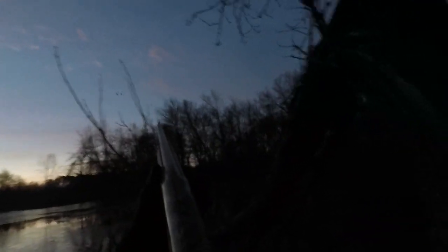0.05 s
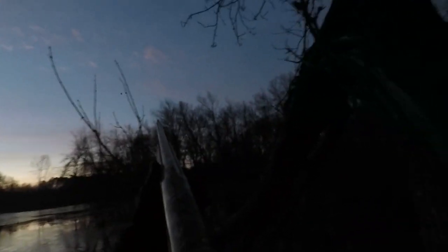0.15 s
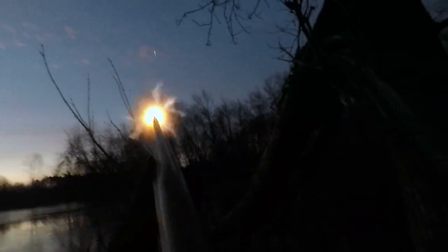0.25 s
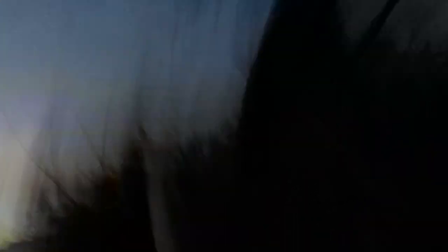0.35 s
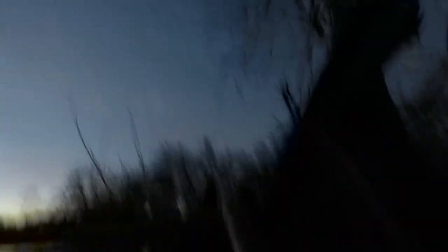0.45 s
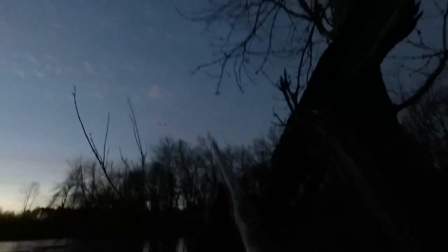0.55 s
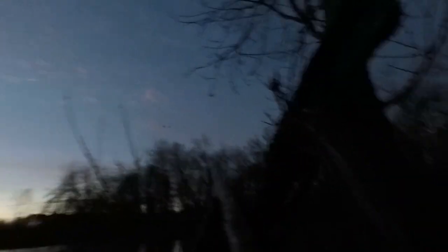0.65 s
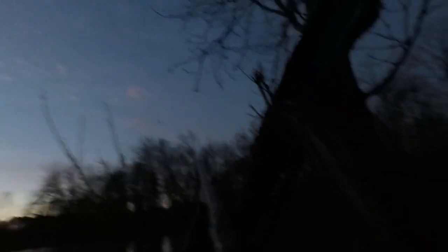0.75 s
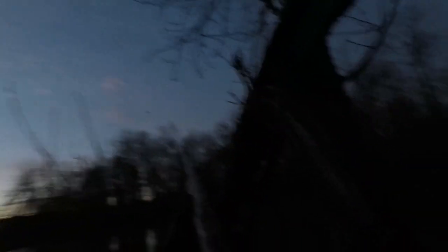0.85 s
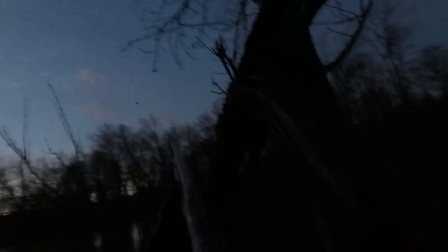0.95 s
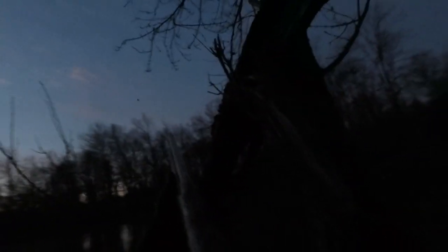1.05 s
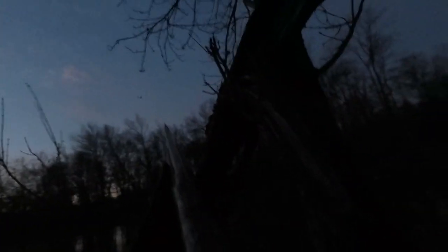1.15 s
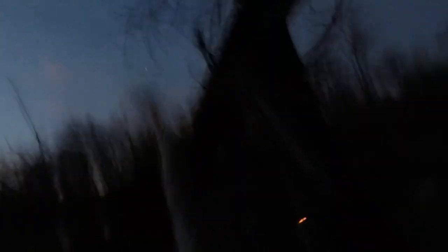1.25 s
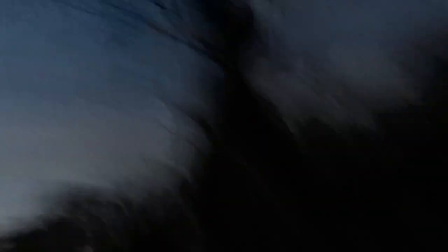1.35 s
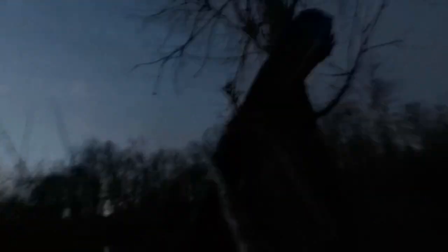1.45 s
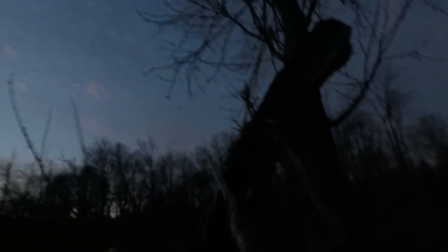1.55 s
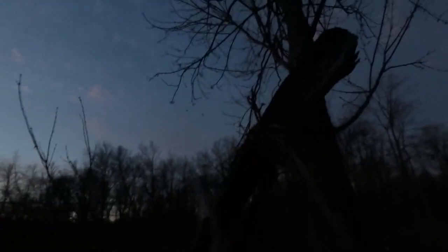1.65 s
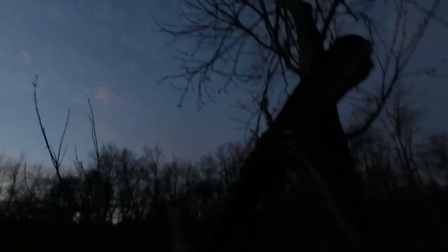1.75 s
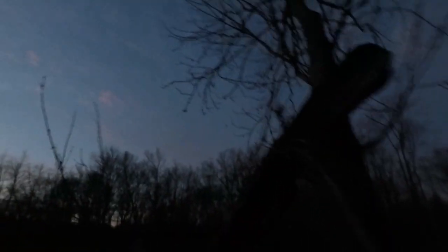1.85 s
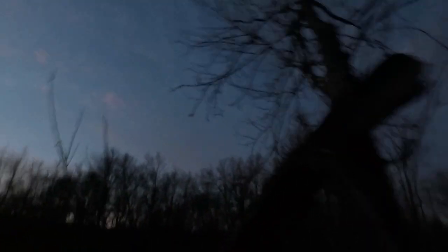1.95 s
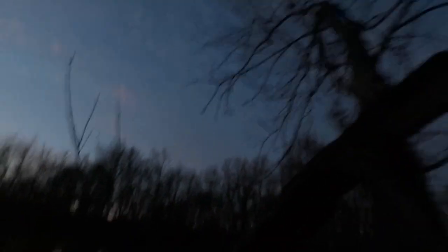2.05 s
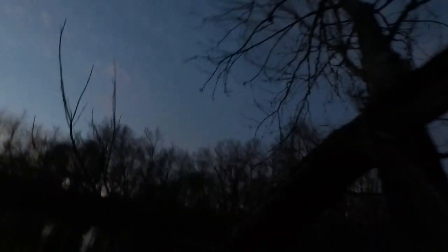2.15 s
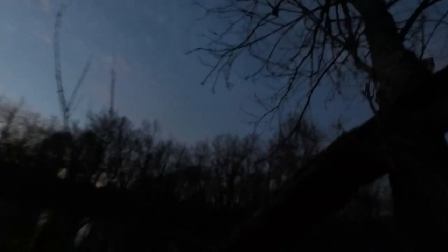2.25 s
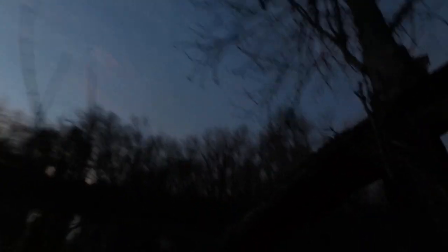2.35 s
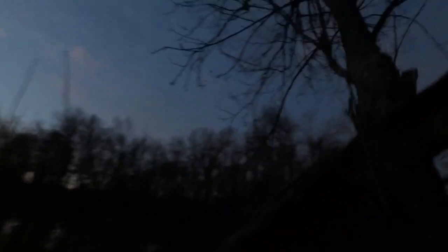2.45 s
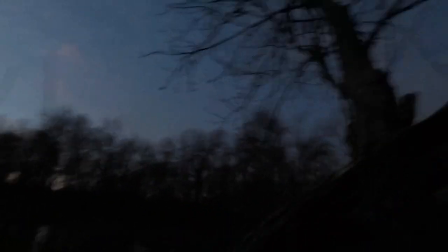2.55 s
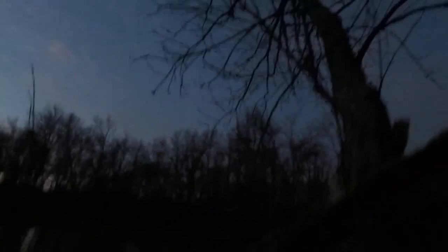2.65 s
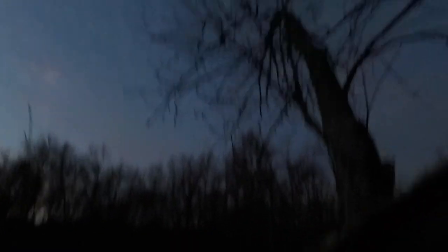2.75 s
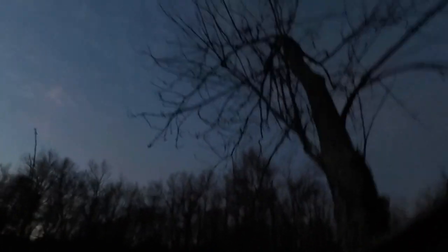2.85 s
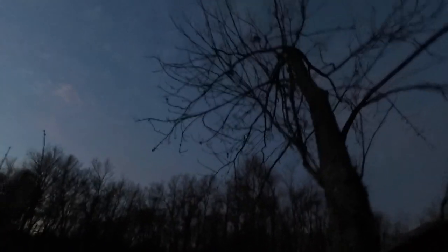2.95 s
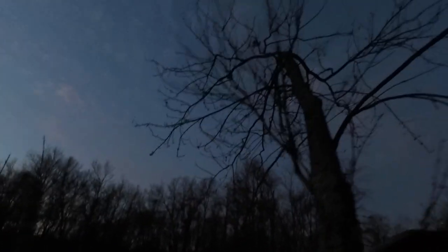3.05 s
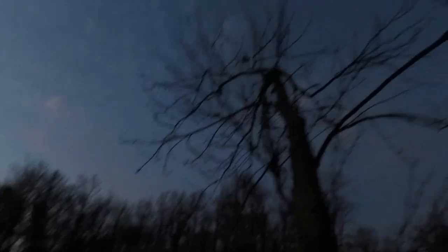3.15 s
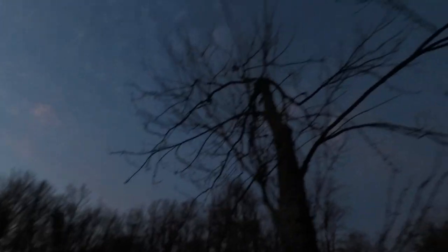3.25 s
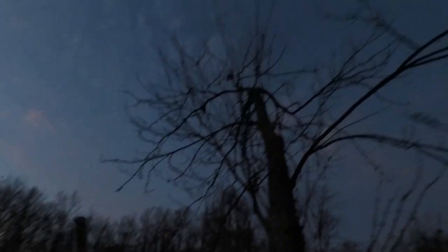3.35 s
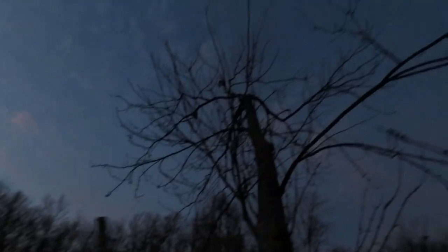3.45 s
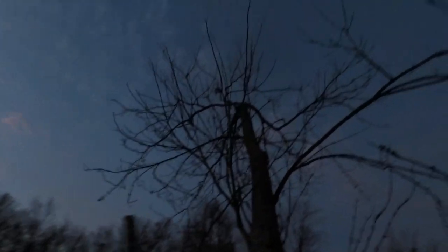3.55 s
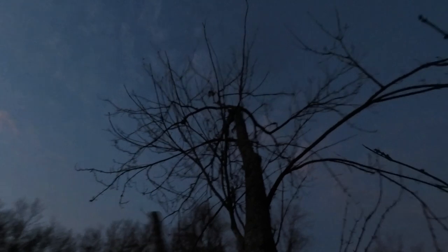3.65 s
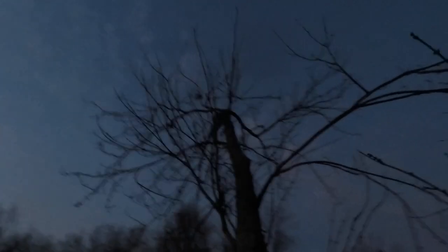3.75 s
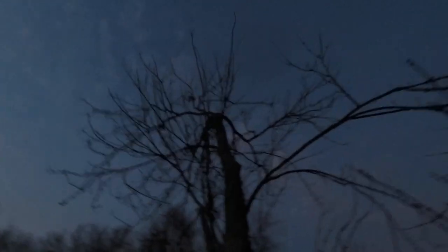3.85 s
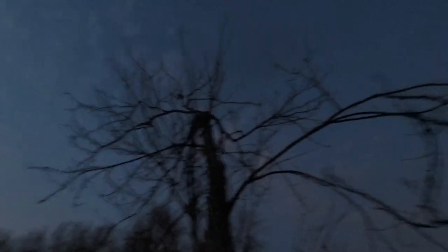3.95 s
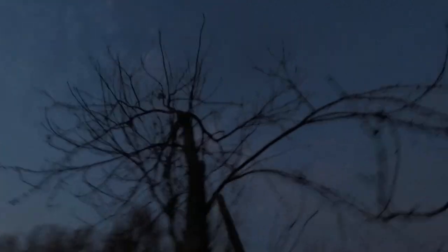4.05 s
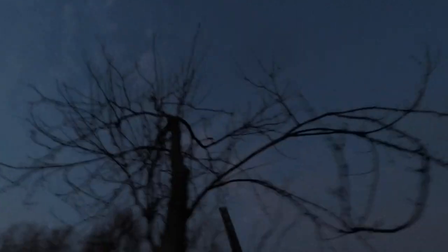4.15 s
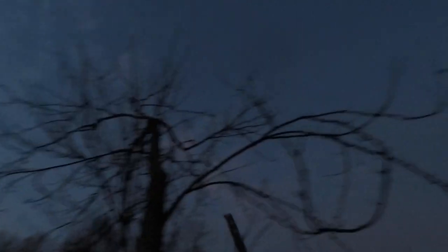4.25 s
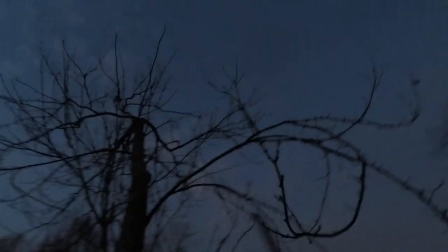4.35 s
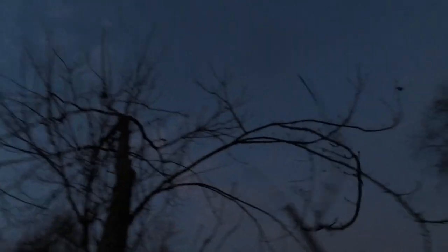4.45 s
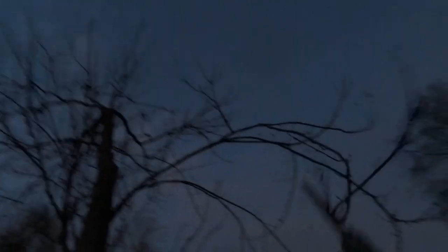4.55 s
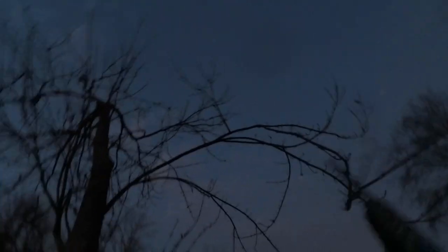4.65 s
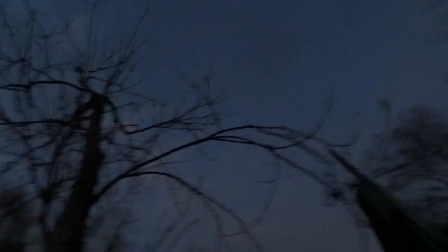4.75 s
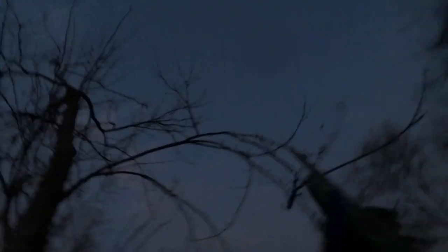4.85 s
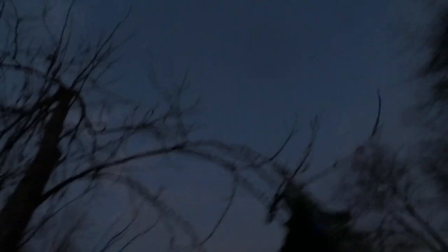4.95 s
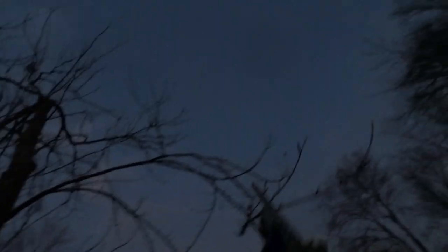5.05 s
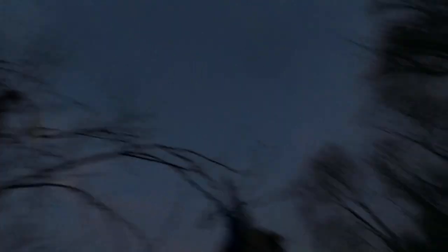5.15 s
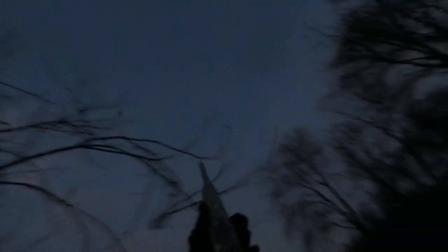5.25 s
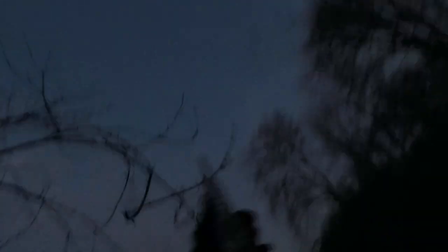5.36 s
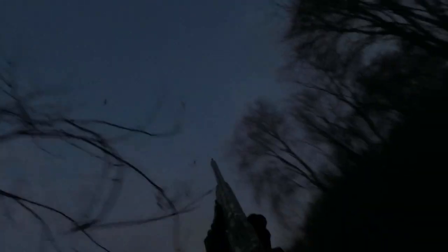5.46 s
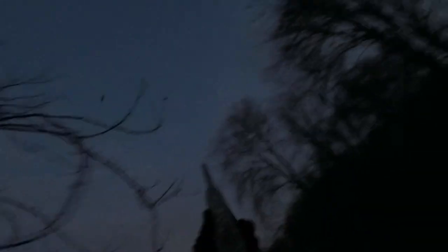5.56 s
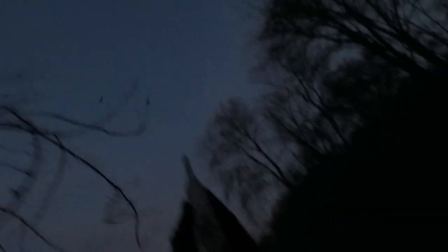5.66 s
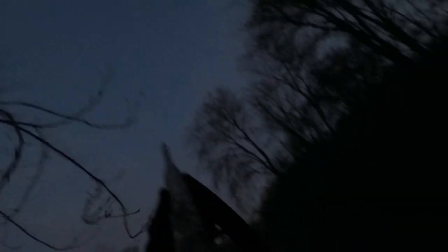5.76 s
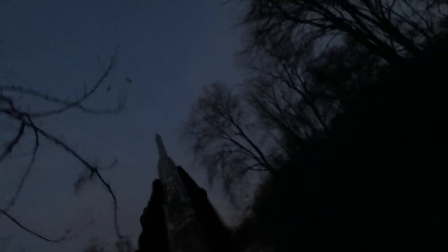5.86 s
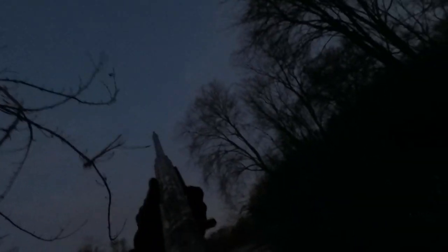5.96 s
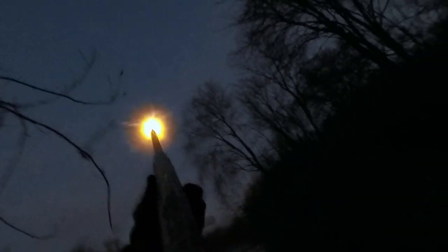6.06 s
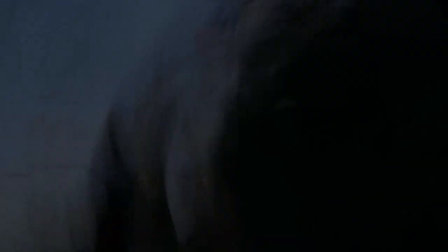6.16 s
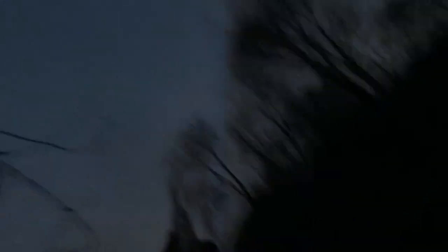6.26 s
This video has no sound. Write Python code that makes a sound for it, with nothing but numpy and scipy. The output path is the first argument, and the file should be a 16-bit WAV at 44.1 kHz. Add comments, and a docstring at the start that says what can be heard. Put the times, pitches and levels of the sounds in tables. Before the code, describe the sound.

Heard from a small camera right beside the gun: two dry, punchy shotgun blasts with short, dull rolling echoes from river banks and woods. The tail thins to near quiet, then wind buffeting grows with faint clothing rustle and scattered metal clicks. A rapid cluster of bright reloading clacks precedes a final blast.

```python
"""Three shotgun shots on a wooded river bank, heard beside a small camera. Before each blast come a tick and a
swelling run of pulses; every blast is a burst of noise that comes twice (muzzle, then water), with short low
tones and single low pushes for the recoil. The banks roll each shot back as fading noise and booms.
Between shots filtered noise makes wind rumble on the microphone ports and clothing rustle, and the gun's
action clicks: short noise snaps with ringing steel."""
import sys
import numpy as np
from scipy import signal
from scipy.fft import rfft, irfft, next_fast_len
from scipy.io import wavfile
from scipy.ndimage import uniform_filter1d, map_coordinates

SR = 44100
rng = np.random.default_rng(int(sys.argv[2]) if len(sys.argv) > 2 else 0)


def dump(signal):
    """Clip the signal to [-1, 1] and save it as 16-bit WAV at the path in sys.argv[1]."""
    limited = np.clip(np.atleast_2d(signal).T, -1, 1)
    pcm = np.round(limited * 32767).astype(np.int16)
    wavfile.write(sys.argv[1], SR, pcm)


N = 277389
TIME = np.arange(N) / SR  # seconds

# The three shots: blast_s, blast_db, water copy later_s, water_db, first tick_db, last pulse before the blast_db,
# growth per pulse_db, loudest run-up low tone_db, growth per low tone_db
SHOT_TABLE = [(.3870, -5, 0.0042, -3, -20, -12.5, 3, -1, 5),
              (1.365, -6.5, .004, -3.5, -46, -22, 7.5, -10, 13),
              (6.1964, -7, .0026, -4, -22, -12.5, 3.5, -3.5, 6)]
# How the wind and the clicks turn between the ports: pitch_hz, left leads right by angle_radians
AIR_PHASE = [(340, 0), (860, -2.1), (1720, -4.2), (4050, -3.7), (5770, -2.7), (9730, -5.1), (11200, -6.4)]
# How the two ports differ in loudness: pitch_hz, left minus right_db
PORT_TILT = [(60, -3.5), (110, 2), (200, 1.5), (380, 6), (700, 3), (1290, -6), (2380, -1), (4400, -1.5),
             (8120, -5), (15000, -1.5)]


def amp(db):
    """Gain of a level in dB."""
    return 10 ** (np.asarray(db) / 20)


def unit(x):
    """Scale a sound to an average (rms) strength of 1."""
    return x / np.sqrt(np.mean(x ** 2) + 1e-20)


def along(points, hz):
    """Read a curve of (pitch, value) points, with pitch spaced as in music (log axis)."""
    point_hz, value = np.transpose(points)
    return np.interp(np.log(hz + 1), np.log(point_hz + 1), value)


def level(spans, column=1):
    """Gain at every moment from a dB column; silent outside the spans, with 10 ms fades."""
    s, db = np.concatenate(spans)[:, [0, column]].T
    inside_s = [np.minimum(TIME - rows[0][0], rows[-1][0] - TIME) for rows in spans]
    gate = np.clip(np.max(inside_s, 0) * 100 + 1, 0, 1)
    return gate * amp(np.interp(TIME, s, db))


def wobble(rate):
    """A smooth random curve with rate random points a second."""
    return map_coordinates(rng.standard_normal(int(N * rate / SR) + 4), [TIME * rate])


def filtered(x, response):
    """Filter a sound by multiplying its spectrum by a (complex) function of pitch."""
    length = next_fast_len(x.shape[-1] + 8192)
    spectrum = rfft(x, length) * response(np.fft.rfftfreq(length, 1 / SR))
    return irfft(spectrum, length)[..., :x.shape[-1]]


def ports(turn, lean):
    """How the two microphone ports shift the timing (phase) and loudness of each pitch, half on each side."""
    sign = np.array([[.5], [-.5]])
    return lambda hz: amp(sign * along(lean, hz)) * np.exp(1j * sign * along(turn, hz))


def rush(spectrum, turn, apart, patchy_db):
    """Stereo noise at the ports, patchy in time and pitch; apart sets the left-right difference."""
    cells = signal.stft(rng.standard_normal((2, N)), nperseg=512)[2]
    patches = uniform_filter1d(rng.standard_normal(cells.shape[1:]), 6, 0)
    patches = unit(uniform_filter1d(patches, 8, 1))
    middle, side = signal.istft(cells * amp(patchy_db * patches), nperseg=512)[1][:, :N]
    pair = np.array([middle + apart * side, middle - apart * side])
    pair = filtered(pair, lambda hz: amp(along(spectrum, hz)) * ports(turn, PORT_TILT)(hz))
    return pair / np.std(pair.mean(0))


def add(out, s, sound):
    """Mix a short sound in at s seconds."""
    part = out[:, round(s * SR):][:, :sound.shape[-1]]
    part += sound[..., :part.shape[1]]


def ring(modes, t, spread_db, attack):
    """Several fading tones together, each with a new random strength every time."""
    tones = 0
    for hz, t60, db in modes:
        strength = amp(db + spread_db * rng.normal() - 60 * t / t60)
        tones = tones + strength * np.sin(2 * np.pi * hz * t)
    return tones * (1 - np.exp(-t / attack))


def puff(colour_db, envelope, apart):
    """A short burst of stereo noise, coloured by a function of pitch."""
    middle, side = filtered(rng.standard_normal((2, len(envelope))), lambda hz: amp(colour_db(hz)))
    return unit(np.array([middle + apart * side, middle - apart * side])) * envelope


def low_gain():
    """Level of the low rumble: wind whose strongest gust throbs, plus the mount's shudder after recoil."""
    # Wind on the ports: time_s, level_db (before the throb)
    wind_levels = [(0, -35), (.34, -42.5), (.42, -42), (.6, -30), (.706, -58), (1.056, -57), (1.34, -46),
                   (1.39, -29), (1.59, -51), (1.64, -55), (2.18, -52), (2.26, -42.5), (2.64, -40.5),
                   (2.68, -34), (3.59, -36), (3.92, -20), (4.12, -25), (4.3, -22), (5.2, -20), (5.46, -15),
                   (5.72, -20), (5.94, -20), (6, -26), (6.2, -30.5), (6.29, -39)]
    # The mount shudders: time_s, level_db
    shudders = [(.494, -26.5), (1.475, -20.5)]
    throb_hz, throb_top_s, throb_db = 5.9, 4.62, 3.5
    throb_mid_s, throb_half_s, shudder_s = 4.62, 0.38, .03
    depth_db = throb_db * np.exp(-((TIME - throb_mid_s) / throb_half_s) ** 4)
    throb = depth_db * np.cos(2 * np.pi * throb_hz * (TIME - throb_top_s))
    wind = amp(np.interp(TIME, *np.transpose(wind_levels)) + throb)
    return wind + sum(amp(db) * np.exp(-((TIME - s) / shudder_s) ** 2) for s, db in shudders)


def air():
    """Wind buffets the ports and rushes past as shaped noise; cloth rustles in fine random grains."""
    # Tone of the low buffeting: pitch_hz, strength_db (per Hz)
    buffet_tone = [(8.8, -25.5), (15, 7), (25, 0), (34, 5), (44, 0), (65, -13), (101, -14.5), (140, -32),
                   (200, -42), (260, -57.5), (440, -120)]
    # Tone of the wind rushing past: pitch_hz, strength_db (per Hz)
    rush_tone = [(65, -4), (110, -12), (200, 1.5), (400, -7), (700, -6), (1200, -9), (2000, -24.5),
                 (3000, -37.5), (5000, -60.5)]
    # Tone of the clothing: pitch_hz, strength_db (per Hz)
    cloth_tone = [(1180, -30.5), (2000, -1), (3070, -1.5), (3460, -3), (4970, -3), (5930, 0),
                  (10100, -12.5), (13000, -24.5), (15000, -44.5)]
    # Spans of rushing and rustling: time_s, wind rush_db, rustle_db (before the random wobble)
    air_levels = [
        [(0, -44.5, -62), (.345, -44, -62)],
        [(2.5, -53.5, -80), (2.75, -55.5, -71), (2.88, -47.5, -67), (3.27, -40.5, -66), (3.7, -39, -63),
         (4.12, -32.5, -54.5), (4.26, -33.5, -59.5), (4.54, -38, -57.5), (4.78, -37, -53), (4.9, -35.5, -47),
         (5.26, -37, -59.5), (5.58, -37.5, -57), (5.78, -40.5, -60), (6.16, -39.5, -62)],
    ]
    buffet = rush(buffet_tone, AIR_PHASE, apart=.1, patchy_db=0)
    swing = np.sqrt(np.abs(uniform_filter1d(buffet.mean(0) ** 2, size=SR // 20)))
    buffet = unit(buffet / (swing + .2) ** .7)  # eddies of like size: a steadier throb than plain noise
    passing = amp(.8 * wobble(25)) * rush(rush_tone, AIR_PHASE, apart=.35, patchy_db=.8)
    grains = amp(.8 * wobble(30) + 1.5 * wobble(300))
    rustle = grains * rush(cloth_tone, AIR_PHASE, apart=.45, patchy_db=.8)
    return low_gain() * buffet + level(air_levels) * passing + level(air_levels, column=2) * rustle


def absorbed(x, treble_db):
    """Air takes more the higher the pitch; treble_db is the change near 4 kHz."""
    hz, t, cells = signal.stft(x, SR, nperseg=512)
    share = np.clip((hz / 1000) ** 1.12 - 1, 0, 9)[:, None] / 4
    return signal.istft(cells * amp(share * np.interp(t, TIME, treble_db)), nperseg=512)[1][:, :N]


def return_power(top_s, rise_s, t60):
    """Power of a return that swells to its top and then dies away, by 60 dB in t60 seconds."""
    u = TIME - top_s
    return np.where(u < 0, np.exp(-(u / rise_s) ** 2), amp(-120 * np.maximum(u, 0) / t60))


def answer():
    """Gain and treble of the banks' scatter; each shot starts them anew."""
    # The banks' answer to each shot: near brush_db, near bank after the blast_s, near bank_db,
    # far bank after the blast_s, far bank_db, woods_db
    bank_table = [(-41, 0.22, -39.5, 0.35, -35, -43.5), (-40, 0.24, -34.5, .36, -40.5, -43.5),
                  (-44, 0.15, -36.5, .3, -38, -52)]
    brush_t60, bank_t60, woods_t60 = 0.24, 0.82, 15  # seconds
    brush_rise_s, bank_rise_s, woods_rise_s = 0.0056, 0.056, .06
    # Treble near 4 kHz: a start level, a short extra, and a loss as the path grows
    start_db, early_db, early_s, db_per_s = 7, 7, .05, -17
    gain, treble_db = np.zeros(N), np.zeros(N)
    for shot, (brush_db, near_s, near_db, far_s, far_db, woods_db) in zip(SHOT_TABLE, bank_table):
        s = shot[0]
        # doubled dB, because these are powers
        power = amp(2 * brush_db) * return_power(s + .02, brush_rise_s, brush_t60)
        power += amp(2 * near_db) * return_power(s + near_s, bank_rise_s, bank_t60)
        power += amp(2 * far_db) * return_power(s + far_s, bank_rise_s, bank_t60)
        power += amp(2 * woods_db) * return_power(s + 0.16, woods_rise_s, woods_t60)
        u = np.maximum(TIME - s, 0)
        gain = np.where(TIME > s, np.sqrt(power), gain)
        shot_treble_db = start_db + early_db * np.exp(-u / early_s) + db_per_s * u
        treble_db = np.where(TIME > s, shot_treble_db, treble_db)
    return gain, treble_db


def banks():
    """Single trunks return short low booms; leaves scatter the rest, the treble dying as the path grows."""
    # Tone of the scatter before the air's loss: pitch_hz, strength_db (per Hz)
    scatter_tone = [(29, -65.5), (50, -34), (65, -33), (82, -11), (160, 1), (322, -3), (456, -7.5),
                    (677, -7), (875, -5), (1720, -10.5), (2380, -17), (5890, -24.5), (13000, -64)]
    # How the echoes turn between the ports: pitch_hz, left leads right by angle_radians
    echo_phase = [(340, 0), (690, -1), (1720, -5.4), (2930, -6.4), (6400, -6.5), (7700, -3.6),
                  (10000, -6.2)]
    # Low returns from single trunks: time_s, pitch_hz, level_db
    trunk_booms = [(0.566, 232, -21), (.598, 267, -24.5), (0.621, 192, -25), (0.644, 174, -17.5),
                   (.665, 230, -24), (.683, 204, -20), (.711, 240, -25), (0.739, 283, -23),
                   (0.786, 225, -26), (1.537, 263, -22.5), (1.56, 242, -26), (1.619, 226, -25.5)]
    boom_half_s, boom_hz, small_boom_db = 0.005, 236, 9  # small booms: at most this far over the scatter's gain
    gain, treble_db = answer()
    scatter = absorbed(rush(scatter_tone, echo_phase, apart=0.58, patchy_db=0.95), treble_db)
    grain = amp(4 + .8 * wobble(60) + 1.3 * wobble(250))
    out = gain * grain * scatter
    sounds = [(s, hz, amp(db)) for s, hz, db in trunk_booms]
    for shot in SHOT_TABLE[:2]:  # ten small chance booms after each of the first two shots
        when, pitch, size = rng.random((10, 3)).T
        s = shot[0] + .17 + .35 * when
        strength = gain[(s * SR).astype(int)] * amp(small_boom_db - 7.5 * size)
        sounds += zip(s, boom_hz * (.8 + .4 * pitch), strength)
    t = np.arange(SR // 16) / SR - 1 / 32  # the boom peaks at t = 0
    for s, hz, strength in sounds:
        boom = np.exp(-(t / boom_half_s) ** 2) * np.sin(2 * np.pi * (hz * t + rng.random()))
        add(out, s + t[0], strength * boom * amp([[2], [-2]]))
    return out


def clicks():
    """Each contact snaps and rings the gun's steel, most near the part struck; loose parts scrape between."""
    # Handling clicks: time_s, level_db, pitch that rings most_hz
    click_table = [(2.7995, -31.5, 2200), (3.2514, -36.5, 6400), (3.382, -16, 3410), (3.937, -20.5, 5600),
                   (4.015, -23, 6000), (4.049, -28.5, 5900), (4.2175, -29, 1400), (4.2755, -33.5, 3500),
                   (4.507, -20, 2280), (4.529, -25, 1700), (4.859, -24, 1400), (4.933, -24.5, 2800),
                   (5.128, -27.5, 1900), (5.181, -26.5, 2200), (5.1943, -23, 1900), (5.2978, -20.5, 4500),
                   (5.309, -15, 4400), (5.347, -24, 2660), (5.3656, -12, 6300), (5.3815, -25.5, 3500),
                   (5.404, -6, 6060), (5.4385, -28, 4550), (5.4693, -34, 4440), (5.488, -17.5, 2200),
                   (5.504, -24.5, 2800), (5.5201, -5.5, 4400), (5.5423, -17, 1700), (5.5675, -28.5, 2800),
                   (5.5972, -30, 2220), (5.7892, -19, 4900)]
    # The gun's steel: pitch_hz, time to fade by 60 dB_s, relative strength_db
    steel_modes = [(1726, 0.022, -1.5), (1900, 0.036, -7), (2174, 0.068, -14), (2670, 0.011, -8),
                   (3433, 0.022, -3.5), (4400, 0.011, -2), (6000, 0.039, -5), (6400, 0.017, 2.5)]
    # Tone of a snap: pitch_hz, strength_db (per Hz)
    snap_tone = [(760, -33), (1300, -8.5), (1710, -2), (2480, -8.5), (5450, -7.5), (6420, -15), (7710, -15),
                 (13000, -63), (15000, -43)]
    # Loose parts scrape: time_s, level_db
    scrape_levels = [
        [(5.08, -55), (5.3, -51), (5.36, -43.5), (5.56, -39), (5.62, -61)],
    ]
    # Ten small chance contacts: their span, middle level and middle pitch
    rattle_start_s, rattle_end_s, rattle_db, rattle_hz = 5.3, 5.6, -29.5, 3000
    snap_t60 = .036  # seconds
    out, t = np.zeros((2, N)), np.arange(SR // 8) / SR
    when, size, pitch = rng.random((10, 3)).T
    small = zip(rattle_start_s + (rattle_end_s - rattle_start_s) * when,
                rattle_db + 8 * (size - .5), rattle_hz * 4 ** (pitch - .5))
    rise = 1 - np.exp(-t / 0.00024)
    for s, db, struck_hz in [*click_table, *small]:
        near = lambda hz: -np.abs(np.log2((hz + 1) / struck_hz))  # minus the octaves from the struck part
        tick_colour = lambda hz: along(snap_tone, np.minimum(hz, 7000)) - hz / 900
        tick = puff(tick_colour, rise * amp(-12.5 - 60 * t / .012), apart=1.0)
        snap_colour = lambda hz: along(snap_tone, hz) + 7 * near(hz)
        snap = puff(snap_colour, rise * amp(-14 - 60 * t / snap_t60), apart=.4)
        modes = [(hz, t60, mode_db + 11 * near(hz)) for hz, t60, mode_db in steel_modes]
        steel = amp(-1) * ring(modes, t, spread_db=2.5, attack=.0005)
        add(out, s, amp(db) * (tick + snap + steel))
    grains = amp(3 * wobble(90) + 2.5 * wobble(400))
    scrape = level(scrape_levels) * unit(grains * rush(snap_tone, AIR_PHASE, apart=1.0, patchy_db=-3.5))
    return filtered(out, ports(AIR_PHASE, PORT_TILT)) + scrape


def parts():
    """List every crack and low tone: time_s, crack_db, low_tone_db, swell_s, dulling_db per octave above 3 kHz."""
    # Near returns: after the blast_s, crack against the blast_db, low tone_db, swell_s
    near_returns = [(.0075, -11, -11, .002), (.025, -24, -43.5, .003)]
    # The action slams after a shot: time_s, crack_db, low tone_db
    slams = [(0.553, -30, -38), (1.544, -28.5, -31), (6.268, -35, -31)]
    tick_s, bounce_s, bounce_db = .0388, .0055, -6  # the first tick before the blast, and its bounce
    pulse_s, pulse_swell_s, pulse_dull_db = .00505, 0.0024, 3  # the run-up pulses evenly
    between_db, last_low_db = -4.5, -3  # pulses without a low tone are weaker; the low tone with the water copy
    blast_swell_s, water_swell_s, blast_dull_db, water_dull_db = .0009, 0.0015, 0.5, 0.5
    no_tone_db = -99  # too quiet to hear
    rows = [(s, db, low_db, .003, 1) for s, db, low_db in slams]
    for s, db, later_s, water_db, tick_db, pulse_db, grows_db, low_db, low_grows_db in SHOT_TABLE:
        rows.append((s - tick_s, tick_db, no_tone_db, .0012, 0))
        rows.append((s - tick_s + bounce_s, tick_db + bounce_db, no_tone_db, .0012, 0))
        rows.append((s, db, no_tone_db, blast_swell_s, blast_dull_db))
        rows.append((s + later_s, water_db, low_db + last_low_db, water_swell_s, water_dull_db))
        for after_s, re_db, return_low_db, swell_s in near_returns:
            rows.append((s + after_s, db + re_db, return_low_db, swell_s, 2))
        for k in range(6):  # counted back from the water copy; every other pulse also carries a low tone
            has_tone = k % 2 == 0
            crack_db = pulse_db - grows_db * k + (0 if has_tone else between_db)
            low_tone_db = low_db - low_grows_db * k / 2 if has_tone else no_tone_db
            rows.append((s + later_s - pulse_s * (k + 2), crack_db, low_tone_db, pulse_swell_s, pulse_dull_db))
    return rows


def blasts():
    """Every crack is a hump of noise with near scatter; every low tone is a few short fading tones."""
    # Tone of a crack: pitch_hz, strength_db (per Hz)
    crack_tone = [(530, -25.5), (900, -13.5), (1170, 5), (1450, -2.5), (2050, -11.5), (3940, -2.5),
                  (4490, -4), (7230, -7.5), (7580, -13.5), (8240, -17.5), (9850, -17.5), (10700, -25),
                  (13600, -31), (15500, -35)]
    # The short low tones: pitch_hz, time to fade by 60 dB_s, relative strength_db
    low_modes = [(290, 0.03, -8.5), (534, 0.018, -0.5), (647, 0.017, -0.5), (706, 0.018, -15.5)]
    # How the cracks turn between the ports: pitch_hz, left leads right by angle_radians
    blast_phase = [(600, 0), (1200, -3.1), (2600, -6.3), (7500, -6.3), (9500, -4), (11000, -5.8),
                   (12700, -4.2)]
    cracks, low_tones, t = np.zeros((2, N)), np.zeros((2, N)), np.arange(SR // 10) / SR
    for s, db, low_tone_db, swell_s, dull_db in parts():
        u = t / swell_s
        colour_db = lambda hz: along(crack_tone, hz) - dull_db * np.log2(np.maximum(hz / 3000, 1))
        hump = (np.e * u * np.exp(-u)) ** 2
        near_scatter = amp(-19 - 60 * t / .05) * (1 - np.exp(-u))
        add(cracks, s, amp(db) * puff(colour_db, hump + near_scatter, apart=0.3))
        low_tone = ring(low_modes, t, spread_db=3.0, attack=0.0012)
        add(low_tones, s, amp(low_tone_db) * low_tone * amp([[-1.5], [1.5]]))
    return low_tones + filtered(cracks, ports(blast_phase, [(1000, -1.9), (3000, -0.028)]))


def mount_swing():
    """The camera mount swings up and rings down as a single low tone."""
    # Swings: top of the swell_s, pitch_hz, level_db, rise_s, time to fade by 60 dB_s
    swings = [(.382, 147.6, -5.5, 0.0097, 0.073), (1.376, 151, -10.5, 0.0036, 0.022),
              (6.197, 140.6, -14.5, 0.0086, 0.036)]
    out = np.zeros((2, N))
    for s, hz, db, rise_s, t60 in swings:
        u = np.clip(TIME - s, -.2, .3)
        envelope = np.where(u < 0, np.exp(-.5 * (u / rise_s) ** 2), amp(-60 * u / t60))
        out += amp(db) * envelope * np.sin(2 * np.pi * hz * u) * amp([[-1.5], [1.5]])
    return out


def high_whine():
    """A thin high tone around each blast: a sine of unsteady strength."""
    # High tones: start_s, end_s, pitch_hz, level_db (before the random wobble)
    whines = [(.36, .383, 7810, -30.5), (1.346, 1.378, 7920, -41.5), (6.173, 6.209, 8180, -31.5)]
    out = np.zeros((2, N))
    for start, end, hz, db in whines:
        gate = np.clip(np.minimum((TIME - start) / 0.01, (end - TIME) / .003), 0, 1)
        tone = gate * amp(db + 3 * wobble(120)) * np.sin(2 * np.pi * hz * TIME)
        out += tone * amp([[2], [-2]])
    return out


def thumps():
    """Recoil and handling push the camera: one low pulse with a shallow rebound on both sides."""
    # Thumps: time_s, pitch_hz, level_db, direction (push +1, pull -1)
    pushes = [(.44, 70, -25, -1), (0.492, 128, -16.5, -1), (.502, 37.2, -22, 1), (0.6, 75, -21, 1),
              (1.428, 69.5, -17.5, 1), (1.45, 38.4, -21, -1), (1.458, 73, -19, 1), (1.47, 85, -20, -1),
              (1.478, 39.5, -16.5, 1), (1.582, 59.6, -26, -1), (4.277, 58.6, -13, -1),
              (5.478, 69.5, -11, 1), (6.164, 35.4, -15, 1), (6.21, 60.4, -18.5, 1), (6.26, 60, -25, 1),
              (6.272, 61.4, -23, -1)]
    out = np.zeros((2, N))
    for s, hz, db, way in pushes:
        u = (TIME - s) * hz * np.pi
        out += np.sign(way) * amp(db) * (1 - 2 * u ** 2) * np.exp(-u ** 2)
    return out


def shots():
    """The blasts with their low tones, the swinging mount, the high whine and the thumps, added together."""
    return blasts() + mount_swing() + high_whine() + thumps()


def scene():
    """Everything at the two ports."""
    return air() + banks() + clicks() + shots()


def record(dry):
    """The input rounds off peaks near full scale; nothing above the band limit passes."""
    top_hz = 15650
    clipped = dry / (1 + np.abs(dry / .98) ** 6) ** (1 / 6)
    return filtered(clipped, lambda hz: hz < top_hz)


dry = scene()
out = record(dry)
dump(out)
```